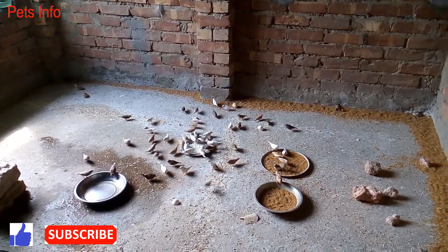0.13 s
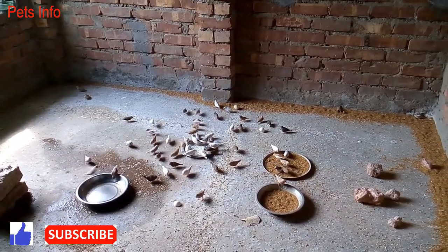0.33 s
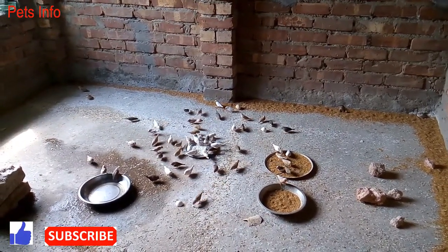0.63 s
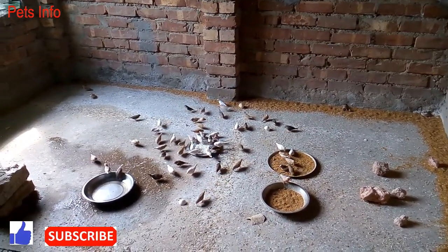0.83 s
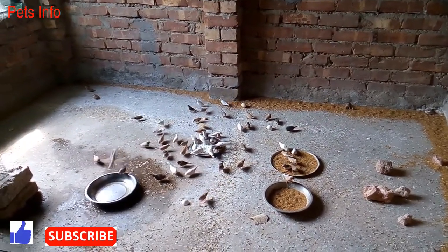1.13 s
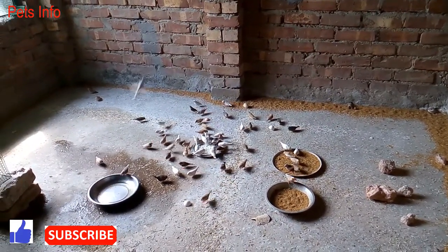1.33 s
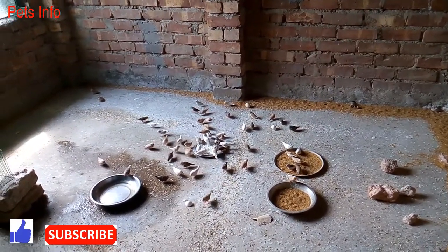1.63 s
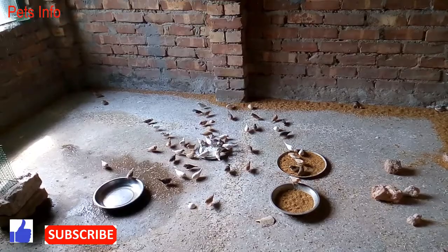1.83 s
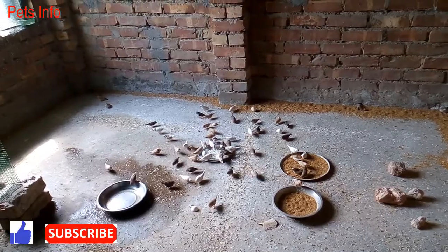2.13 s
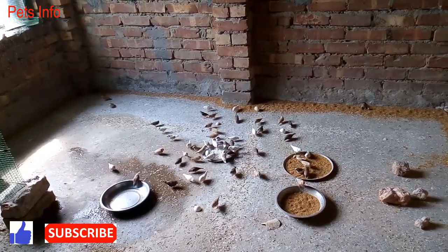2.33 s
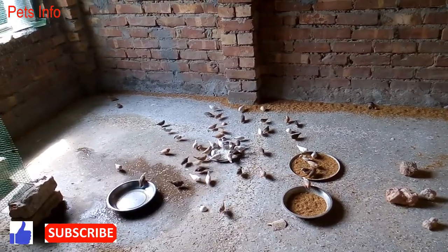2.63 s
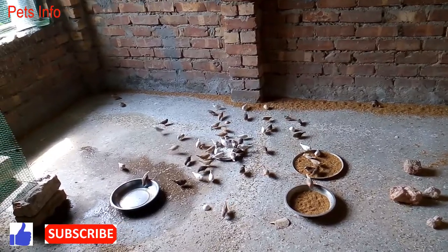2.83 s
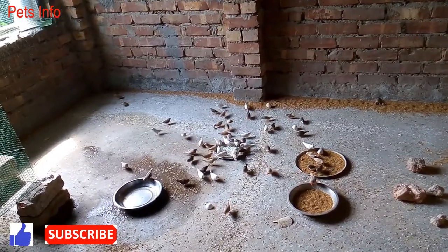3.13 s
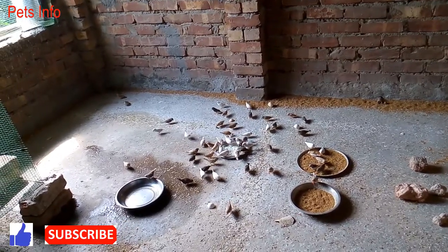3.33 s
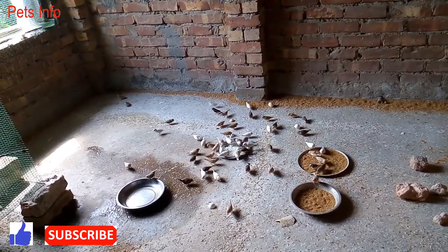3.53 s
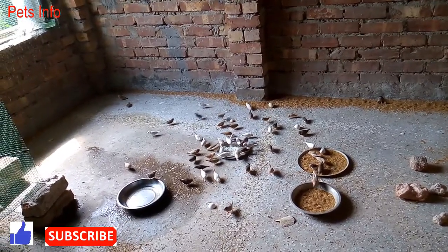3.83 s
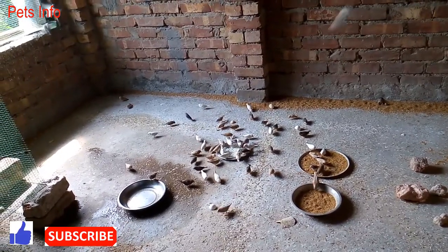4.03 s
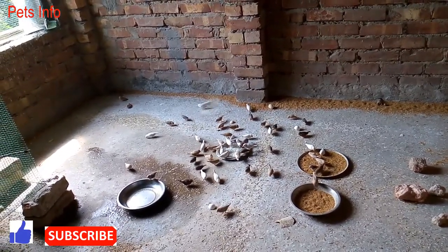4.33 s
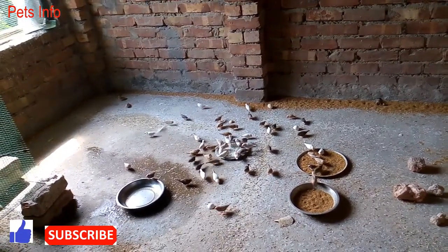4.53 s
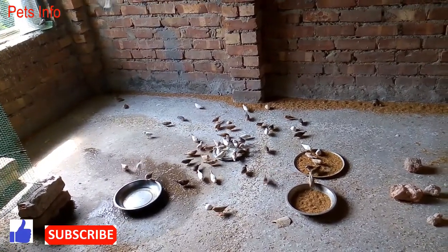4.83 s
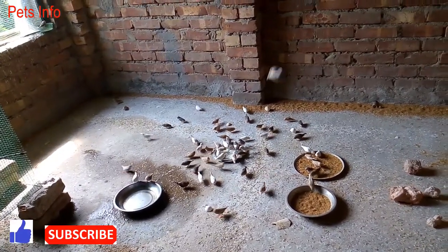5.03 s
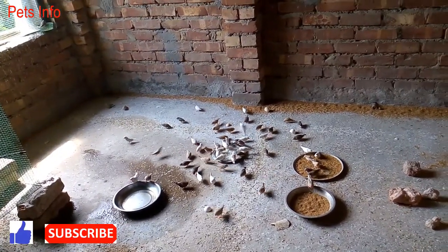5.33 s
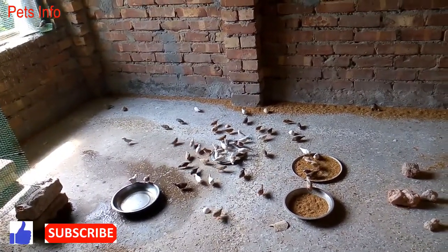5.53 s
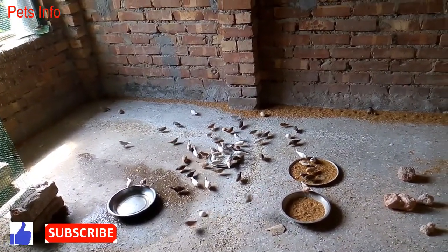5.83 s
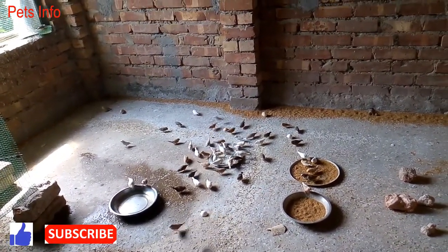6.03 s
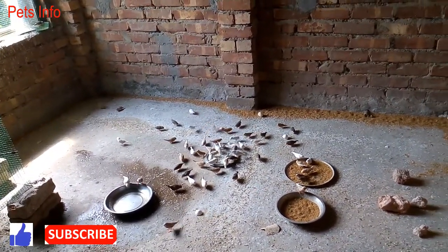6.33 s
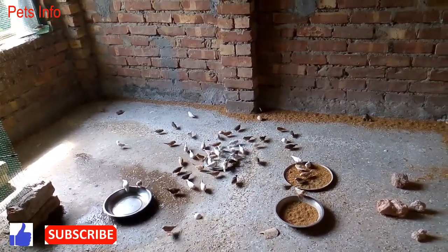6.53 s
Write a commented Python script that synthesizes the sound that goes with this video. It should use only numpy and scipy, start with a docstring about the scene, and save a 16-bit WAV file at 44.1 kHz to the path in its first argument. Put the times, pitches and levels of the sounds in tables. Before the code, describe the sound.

Many small finches call together in a hard-walled brick room. Short nasal beeps, hoarse falling notes and thin sliding whistles overlap above a blurred murmur of distant birds. Wings flutter softly and beaks and feet tap the floor. Past the middle comes a quick bright burst of song with chips; near the end, rapid chips lead into five harsh rasps. The microphone stands back, with a short echo and very faint hum.

```python
"""Finches feeding in a brick aviary

A flock of small finches feeds on a concrete floor: trembling-membrane voices make nasal calls and rasps.
Sliding tones make whistles and a burst of song; then one bird breaks into chips and harsh rasps.
Shaped noise makes fluttering wings, tapping beaks and feet, and a distant murmur.
The walls ring briefly, and a faint hum of steady tones lies underneath."""
import sys
import numpy as np
from scipy import signal
from scipy.fft import rfft, irfft, next_fast_len
from scipy.io import wavfile
from scipy.ndimage import uniform_filter1d

SR = 44100
rng = np.random.default_rng(int(sys.argv[2]) if len(sys.argv) > 2 else 0)


def wav_record(signal):
    """Record a signal, one row per channel, as 16-bit PCM in the file named by sys.argv[1]."""
    frames = np.transpose(np.atleast_2d(signal))
    bounded = np.clip(frames, -1, 1)
    # unit amplitude maps onto the largest positive 16-bit level
    quanta = np.round(bounded * 32767).astype(np.int16)
    wavfile.write(sys.argv[1], SR, quanta)


N = 295029   # length of the scene in samples
LONGEST = SR * 3 // 5   # longest single gesture or echo, in samples
CUTOFF_HZ = 15750   # top of the audible band


def from_db(db):
    """Turn decibels into a gain."""
    return 10 ** (np.asarray(db) / 20)


def rms_one(x):
    """Scale a sound to an rms of 1."""
    return x / np.sqrt(np.mean(x ** 2) + 1e-20)


def at_hz(points, hz):
    """Read a two-column table at a frequency, in between its rows on a log-frequency axis."""
    knots, values = np.transpose(points)
    return np.interp(np.log(np.maximum(hz, 1)), np.log(knots), values)


def by_length(points, length):
    """Read every further column of a table at the length of a call."""
    knots, *columns = np.transpose(points)
    return [np.interp(length, knots, column) for column in columns]


def noise(colour, size):
    """Noise with the given spectrum and an rms of 1."""
    hz = np.linspace(0, SR / 2, size // 2 + 1)
    spectrum = rfft(rng.standard_normal(size)) * from_db(at_hz(colour, hz))
    return rms_one(irfft(spectrum, size))


def tremble(rate_hz, size):
    """Smooth random motion with a spread of about 1: noise through a two-step low-pass."""
    r = np.exp(-2 * np.pi * rate_hz / SR)
    motion = signal.lfilter([1], [1, -2 * r, r * r], rng.standard_normal(LONGEST))
    return rms_one(motion)[-size:]


def progress(length):
    """A ramp from 0 to 1 over one gesture, length in seconds."""
    return np.linspace(0, 1, int(np.clip(length * SR, 64, LONGEST)))


def swell(u, rise, fall):
    """Rounded onset and release, each a share of the gesture."""
    return np.sin(np.pi / 2 * np.clip(np.minimum(u / rise, (1 - u) / fall), 0, 1))


def arch(u, start, middle, end):
    """A smooth curve through three points."""
    return np.polyval(np.polyfit([0, .5, 1], [start, middle, end], 2), u)


def glide_phase(pitch):
    """The phase of a tone whose pitch in Hz changes from sample to sample."""
    return 2 * np.pi * np.cumsum(pitch) / SR


def add(track, s, sound):
    """Mix a sound in at time s, cutting whatever falls outside the scene."""
    at = round(s * SR)
    part = sound[max(-at, 0):max(N - at, 0)]
    track[max(at, 0):max(at, 0) + len(part)] += part


# The tint of the distant murmur. Each row: frequency in Hz, relative level in dB.
MURMUR_COLOUR = [(25, -31), (70, -5), (200, -4.5), (600, -5), (1200, 6), (2500, 22.5), (4200, -3.5),
                 (5700, -4.5), (7000, 10), (12000, -15.5), (16000, -44)]
# The steady hum. Each row: frequency in Hz, rms level in dB.
HUM = [(70, -79), (135, -86), (199, -88), (409, -78.5)]
# A faint low drone that comes and goes.
# Each row: start in seconds, length in seconds, start, middle and end pitch in Hz, level in dB.
DRONE = [(5.18, 0.37, 360, 359, 269, -55.5), (5.211, 0.21, 407, 412, 395, -53)]
MURMUR_DB = -40.5   # level at average excitement


def background(excited_db, drone_jitter=0.023, patchy_db=3.0, count=70):
    """Noise that comes and goes band by band forms a blurred murmur; sine tones form hum and drone."""
    t = np.arange(N) / SR
    hum = sum(np.sqrt(2) * from_db(db) * np.sin(2 * np.pi * hz * t) for hz, db in HUM)
    for s, length, start, middle, end, db in DRONE:
        u = progress(length)
        pitch = arch(u, start, middle, end) * (1 + drone_jitter * tremble(34, size=len(u)))
        add(hum, s, from_db(db) * swell(u, rise=0.042, fall=0.19) * np.sin(glide_phase(pitch)))

    size = next_fast_len(N)
    spectrum = rfft(noise(MURMUR_COLOUR, size=size))
    hz = np.linspace(0, SR / 2, size // 2 + 1)
    murmur = 0
    edges_hz = [0, 250, 900, 1600, 2200, 2900, 3800, 5200, 8000, SR]
    for low, high in zip(edges_hz, edges_hz[1:]):
        patches = np.interp(t, np.linspace(0, N / SR, count), rng.standard_normal(count))
        band = irfft(spectrum * (hz >= low) * (hz < high), size)[:N]
        murmur = murmur + band * from_db(patchy_db * patches)
    return from_db(MURMUR_DB + excited_db) * rms_one(murmur) + hum


# How long the brick room rings. Each row: frequency in Hz, time to fall by 60 dB in seconds.
ROOM_T60 = [(100, 0.81), (1000, 0.33), (3000, 0.38), (7000, 0.22), (15000, 0.16)]


def room(x, first_echo_s=0.0039):
    """Dense wall echoes as fading bands of noise; the lowest bands ring longest."""
    t = np.arange(LONGEST) / SR
    tail = 0
    edges_hz = np.geomspace(40, 18000, 10)
    for low, high in zip(edges_hz, edges_hz[1:]):
        band_pass = signal.butter(2, [low, high], "band", fs=SR, output="sos")
        band = signal.sosfilt(band_pass, rng.standard_normal(LONGEST))
        tail = tail + band * from_db(-60 * t / at_hz(ROOM_T60, np.sqrt(low * high)))
    tail = tail * (t > first_echo_s)
    return signal.fftconvolve(x, tail / np.linalg.norm(tail))[:N]


# The louder taps of beaks and feet. Each row: start in seconds, starting level in dB before tap_db.
TAPS = [(1.036, -38), (1.652, -44.5), (1.71, -36), (2.007, -39), (2.543, -43), (2.859, -36), (2.905, -37),
        (3.052, -33), (3.886, -40), (4.213, -36), (4.29, -32.5), (4.739, -33), (4.878, -30), (4.951, -32),
        (5.076, -42.5)]
# The tint of a tap. Each row: frequency in Hz, relative level in dB.
TAP_COLOUR = [(150, -17.5), (500, -6), (1000, 1), (1900, 7.5), (4000, 2.5), (5600, -11), (7500, 2.5),
              (15000, -29)]


def taps(t60=0.084, tap_db=-2, seed_db=-42, seed_spread_db=4, count=45):
    """Fast-fading noise makes knocks on the floor, among many faint ticks of cracking seed."""
    out = np.zeros(N)
    t = np.arange(4096) / SR
    for s, db in TAPS:
        add(out, s, from_db(db + tap_db - 60 * t / t60) * noise(TAP_COLOUR, size=len(t)))
    starts, sizes = rng.uniform(0, N / SR, count), rng.uniform(-1, 1, count)
    for s, size in zip(starts, sizes):
        # differences between neighbouring samples brighten the tick
        tick = rms_one(np.diff(noise(TAP_COLOUR, size=len(t)), prepend=0))
        add(out, s, from_db(seed_db + seed_spread_db * size - 60 * t / 0.013) * tick)
    return out


# Wing flutters.
# Each row: start in seconds, length in seconds, feather swish in dB, low push of air in dB.
FLUTTERS = [ (-.05, 0.45, -45.5, -60), (.178, .14, -37.5, -99), (0.92, 0.24, -47.5, -62),
            (1.155, 0.56, -47, -58.5), (1.687, 0.27, -49.5, -63.5), (2.263, 0.14, -53, -64.5),
            (2.852, 0.15, -46, -74), (3.036, 0.126, -38, -60.5), (3.447, 0.073, -44, -81),
            (4.189, .13, -46.5, -69), (4.55, 0.57, -50.5, -63), (5.15, 0.54, -53, -64.5),
            (5.636, 0.36, -80, -59)]
# The tint of the feather swish. Each row: frequency in Hz, relative level in dB.
FEATHERS = [(120, -85), (300, 2.5), (700, 2), (1200, 3), (2600, 9), (5600, -2), (7000, 6.5), (11000, -12.5),
            (16000, -63)]
# The tint of the air push. Each row: frequency in Hz, relative level in dB.
AIR_PUSH = [(25, -12), (45, -25), (70, 7), (100, -15.5), (138, 11.5), (175, -13), (260, -6.5), (420, -44.5),
            (900, -23), (3000, -44)]
WINGBEATS_PER_S = 28   # average, the beats are uneven


def wings(stroke_db=7, lumpy_db=2.5, unevenness=0.13):
    """Every wingbeat swells two noises together: the swish of feathers and a puff of air."""
    out = np.zeros(N)
    for s, length, swish_db, push_db in FLUTTERS:
        u = progress(length)
        beats = np.cumsum(WINGBEATS_PER_S * (1 + unevenness * tremble(6.6, size=len(u)))) / SR
        strokes_db = stroke_db * np.cos(2 * np.pi * beats) + lumpy_db * tremble(23.5, size=len(u))
        strokes = rms_one(from_db(strokes_db))
        swish = from_db(swish_db) * noise(FEATHERS, size=LONGEST)
        push = from_db(push_db) * noise(AIR_PUSH, size=LONGEST)
        add(out, s, (swish + push)[:len(u)] * strokes * swell(u, rise=0.21, fall=0.22))
    return out


def syrinx(pitch, jitter, jitter_hz, throat_db, half_db=-80, hoarse_db=-40, uneven_db=0):
    """Harmonics of a trembling membrane, shaped by the throat; alternating cycles add half lines."""
    size = len(pitch)
    phase = glide_phase(pitch * (1 + jitter * tremble(jitter_hz, size=size)))
    k = np.arange(2, 2 * CUTOFF_HZ / pitch.mean())[:, None] / 2   # 1, 1.5, 2, .. times the pitch
    own_db = uneven_db * rng.standard_normal(size=(128, 1))[:len(k)]   # every call favours other partials
    hz = k * pitch[::64]   # the throat is read once every 64 samples
    gains = from_db(throat_db(hz) + own_db + half_db * (k % 1 > 0)) * (hz < SR / 2)
    partials = np.sin(np.float32(k * phase + k ** 2))
    tone = rms_one(np.sum(gains[:, np.arange(size) // 64] * partials, axis=0))
    # turbulence escapes once a cycle and passes through the same throat
    air = rng.standard_normal(LONGEST)[:size] * (1 + np.cos(phase))
    throat = from_db(throat_db(np.linspace(20, SR / 2, size // 2 + 1)))
    air = rms_one(irfft(rfft(air) * throat, size))
    return rms_one(tone + from_db(hoarse_db) * air)


FAR_DB = -41   # typical level of one distant call at average excitement
# The throat in nasal calls, far and near. Each row: frequency in Hz, relative level in dB.
NASAL_THROAT = [(500, -45), (950, -17.5), (1400, -8), (1900, -5), (2600, 1), (3800, -1), (4900, -0.5),
                (5700, -7.5), (6800, -7), (8500, -24), (11500, -24), (13500, -34), (16000, -56)]


def far_calls(spread_db=3.0, far_hz=830, pitch_spread=.3, far_s=.075, length_spread=0.38, count=70):
    """Soft, short membrane calls, spread at random over the whole scene."""
    def throat(hz):
        return at_hz(NASAL_THROAT, hz) - 12 * (hz < 1400)   # the fundamental hardly carries

    out = np.zeros(N)
    for k, (when, length, pitch, size) in enumerate(rng.uniform(-1, 1, (count, 4))):
        u = progress(far_s * (1 + length_spread * length))
        top = far_hz * (1 + pitch_spread * pitch)
        voice = syrinx(arch(u, .96 * top, top, .92 * top), .012, 260, throat, hoarse_db=-14, uneven_db=4.5)
        add(out, (k + when) / count * N / SR, voice * np.sin(np.pi * u) * from_db(FAR_DB + spread_db * size))
    return out


WAVER_SHARE, WAVER_HZ = 0.00618, 26   # slow unsteadiness of the pitch: share of the pitch, and rate


def nasal_call(length, pitch, shape, rough, beak, jitter=.039, jitter_hz=260,
               beak_db=7, beak_rough_db=2, beak_octaves=0.39, half_db=-19, half_rough_db=12,
               rise=0.28, fall=0.55, shake_db=2.0, hoarse_db=-26, hoarse_rough_db=27):
    """A curved harmonic stack; the beak opening lifts one region, and rough calls turn hoarse."""
    def throat(hz):
        lift_db = beak_db + beak_rough_db * rough
        return at_hz(NASAL_THROAT, hz) + lift_db * np.exp(-(np.log2(hz / beak) / beak_octaves) ** 2)

    u = progress(length)
    waver = 1 + WAVER_SHARE * tremble(WAVER_HZ, size=len(u))
    glide = pitch * arch(u, shape[0], 0.99, shape[1]) * waver
    voice = syrinx(glide, jitter * rough, jitter_hz, throat, half_db + half_rough_db * rough,
                   hoarse_db + hoarse_rough_db * np.sqrt(abs(rough)), uneven_db=3.0)
    return voice * swell(u, rise, fall) * from_db(shake_db * tremble(67, size=len(u)))


# Short contact calls with an arched pitch.
# Each row: start in seconds, base pitch in Hz, level in dB, beak resonance in Hz.
CONTACT_CALLS = [ (.115, 980, -31.5, 2530), (.941, 873, -36, 2470), (1.389, 942, -33, 2600),
                 (1.848, 899, -32.5, 3840), (1.96, 905, -34, 3750), (2.116, 888, -33.5, 3930),
                 (2.261, 894, -29, 5040), (2.478, 838, -39, 2720), (3.256, 912, -33.5, 3530),
                 (3.396, 893, -34.5, 3240), (3.595, 903, -29, 4900), (5.62, 892, -34.5, 2660),
                 (5.868, 916, -30.5, 2770)]
CONTACT_S, CONTACT_ROUGH = .093, 0.49   # length in seconds; roughness 0-1
# Long clear calls.
# Each row: start in seconds, length in seconds, base pitch in Hz, level in dB, beak resonance in Hz.
LONG_CALLS = [(0.569, 0.16, 974, -26.5, 4470), (3.675, 0.11, 942, -33, 3970),
              (3.783, .17, 965, -29.5, 3620), (5.141, .205, 960.5, -31, 3700), (6.06, .13, 955, -28, 3700)]
LONG_ROUGH = .11   # roughness 0-1
# Pitch of contact and long calls at the start and at the end, as shares of the base pitch.
CALL_ARCH = (0.97, 0.96)
# Low, nearly level calls. Each row: start in seconds, length in seconds, base pitch in Hz, level in dB.
LOW_CALLS = [ (.395, 0.22, 610.7, -30.5), (1.167, 0.1, 566, -34.5), (1.387, 0.26, 638, -40),
             (1.773, 0.091, 580, -38.5), (2.182, 0.092, 652, -39), (2.415, 0.23, 635, -45.5),
             (2.58, .09, 545, -40.5), (2.737, 0.063, 574, -42.5), (3.33, 0.2, 497, -36),
             (5.005, 0.16, 609, -46), (5.658, 0.17, 600, -30)]
# Pitch of low calls at the start and at the end, as shares of the base pitch.
LOW_SAG = (1.02, 0.98)
# The longer a low call is held, the wider the beak and the clearer the voice.
# Each row: length in seconds, roughness 0-1, beak resonance in Hz.
LOW_VOICE = [(.09, 0.46, 2920), (.17, 0.17, 4100)]
# Hoarse falling calls.
# Each row: start in seconds, length in seconds, base pitch in Hz, level in dB, beak resonance in Hz.
HOARSE_CALLS = [ (-.04, 0.15, 891.6, -27, 3800), (0.199, 0.077, 824, -34, 2900),
                (0.661, 0.2, 789, -33, 2400), (1.23, 0.26, 1127, -32, 4630), (2.323, 0.077, 815, -32, 4550),
                (3.088, .13, 819, -35.5, 3920), (3.505, .14, 1121, -31, 5000),
                (3.917, .075, 1108, -34, 4050), (4.493, 0.2, 1156, -33, 2440),
                (4.874, 0.11, 827, -35.5, 2860), (5.326, 0.064, 844, -35, 3360),
                (5.488, .19, 939, -33.5, 4170)]
HOARSE_FALL, HOARSE_ROUGH = (1.05, .9), 0.892   # start and end, shares of base pitch; roughness 0-1


def nasal_calls():
    """Four kinds of membrane call; contact and long calls share one arch, low ones clear with length."""
    out = np.zeros(N)
    for s, pitch, db, beak in CONTACT_CALLS:
        add(out, s, from_db(db) * nasal_call(CONTACT_S, pitch, CALL_ARCH, CONTACT_ROUGH, beak))
    for s, length, pitch, db, beak in LONG_CALLS:
        add(out, s, from_db(db) * nasal_call(length, pitch, CALL_ARCH, LONG_ROUGH, beak))
    for s, length, pitch, db in LOW_CALLS:
        rough, beak = by_length(LOW_VOICE, length)
        add(out, s, from_db(db) * nasal_call(length, pitch, LOW_SAG, rough, beak))
    for s, length, pitch, db, beak in HOARSE_CALLS:
        add(out, s, from_db(db) * nasal_call(length, pitch, HOARSE_FALL, HOARSE_ROUGH, beak))
    return out


# How strong an overtone of a whistle is. Each row: overtone frequency in Hz, dB against the fundamental.
OVERTONES = [(3500, 4), (4800, -25), (5700, -18), (7200, -19), (8800, -19.5), (10000, -37), (15000, -44)]


def whistle(length, pitches, rough, jitter=0.0896, jitter_hz=550, rise=0.17, fall=0.12,
            shake_db=4, buzz_db=8):
    """A gliding tone with overtones, faint when high, blurred by fast trembles of pitch and strength."""
    u = progress(length)
    glide = arch(u, *pitches)
    phase = glide_phase(glide * (1 + jitter * rough * tremble(jitter_hz, size=len(u))))
    tone = np.sin(phase)
    for k in range(2, 5):
        tone = tone + from_db(at_hz(OVERTONES, k * glide)) * np.sin(k * phase)
    buzz = buzz_db * rough * np.tanh(tremble(250, size=len(u)))
    shake = shake_db * np.tanh(tremble(137, size=len(u)))
    return rms_one(tone * from_db(buzz + shake)) * swell(u, rise, fall)


# Sliding whistles, mostly falling.
# Each row: start in seconds, length in seconds, mid-whistle pitch in Hz, slide in semitones, level in dB.
WHISTLES = [ (0.056, 0.013, 2280, 3, -26.5), (.447, .12, 4610, -2.5, -33), (0.715, 0.073, 4320, -3.5, -36),
            (.759, 0.036, 3630, -2, -26.5), (0.8, .062, 2632, -3, -20.5), (1.075, 0.044, 4360, 0, -34),
            (1.258, 0.065, 4540, -1.5, -33.5), (1.44, .041, 2800, -1.5, -36), (1.88, .05, 3470, -3, -31.5),
            (1.912, 0.096, 4590, -1.5, -33), (1.981, 0.087, 3680, -1.5, -32.5),
            (2.223, 0.019, 2400, 2, -29.5), (2.27, 0.13, 4430, -1.5, -33.5), (2.325, 0.033, 2500, 3, -32.5),
            (3.129, 0.045, 3570, 0.5, -35), (3.16, 0.084, 4530, -1, -30.5), (3.219, .11, 3650, -1.5, -35.5),
            (3.527, 0.097, 4600, -3, -36), (4.964, .095, 2382, -4.5, -31.5), (5.062, 0.088, 2460, 2, -43),
            (5.134, 0.16, 1810, 6, -35), (5.226, .1, 2429, 4, -23.5), (5.3, 0.065, 2155, -1.5, -33.5),
            (5.38, 0.053, 2390, -10.5, -31.5), (5.489, 0.037, 4790, -1, -28),
            (5.529, 0.089, 4430, -3.5, -36), (5.693, 0.15, 4270, -4.5, -33), (6.275, 0.083, 3314, -4, -26),
            (6.352, 0.065, 2754, 0, -19), (6.635, .041, 2480, 1.5, -30), (6.66, .02, 3380, 4.5, -25)]
# Whistles of middling pitch are the smoothest. Each row: pitch in Hz, roughness before strain.
WHISTLE_ROUGH = [(1900, 0.68), (2700, 0.17), (4500, 0.64)]
# Roughness grows the longer a whistle is held. Each row: length in seconds, factor on the roughness.
WHISTLE_STRAIN = [(.04, 0.78), (.1, 1.13)]
EARLY_SLIDE = .6   # share of the slide covered in the first half of a whistle


def whistles():
    """Gliding tones that slide faster in their first half than in their second."""
    out = np.zeros(N)
    for s, length, pitch, slide, db in WHISTLES:
        semitones = slide * np.array([-EARLY_SLIDE, 0, 1 - EARLY_SLIDE])
        strain, = by_length(WHISTLE_STRAIN, length)
        rough = at_hz(WHISTLE_ROUGH, pitch) * strain
        add(out, s, from_db(db) * whistle(length, pitch * 2 ** (semitones / 12), rough))
    return out


# The warble of the song.
# Each row: start in seconds, length in seconds, start pitch in Hz, end pitch in Hz, level in dB.
WARBLE = [(4.284, .036, 3700, 4630, -21.5), (4.313, 0.032, 3100, 3147, -19.5),
          (4.354, .066, 3660, 2400, -19.5), (4.398, 0.047, 2500, 2830, -24.5),
          (4.482, 0.029, 3800, 2800, -22), (4.529, 0.057, 2800, 4204, -18.5), (4.577, .03, 3850, 3005, -29),
          (4.69, .041, 3870, 3800, -26)]
WARBLE_SAG, WARBLE_ROUGH = .96, 0.57   # mid-note pitch as a share of the even glide; roughness 0-1
# One quick upsweep, repeated through the song. Each row: start in seconds, level in dB.
UPSWEEPS = [(4.506, -19.5), (4.638, -19), (4.763, -18.5), (4.83, -19), (4.9, -40)]
UPSWEEP_HZ = (3220, 4080, 4280)   # start, middle and end pitch
UPSWEEP_S, UPSWEEP_ROUGH = .017, 0.58   # length in seconds; roughness 0-1


def song():
    """Gliding tones form a rough warble, laced with upsweeps that share one pitch curve."""
    out = np.zeros(N)
    for s, length, start, end, db in WARBLE:
        middle = WARBLE_SAG * np.sqrt(start * end)
        add(out, s, from_db(db) * whistle(length, (start, middle, end), WARBLE_ROUGH))
    for s, db in UPSWEEPS:
        add(out, s, from_db(db) * whistle(UPSWEEP_S, UPSWEEP_HZ, UPSWEEP_ROUGH))
    return out


# Chips, quick up-and-down flicks.
# Each row: start in seconds, length in seconds, top pitch in Hz, level in dB.
CHIPS = [ (4.149, 0.029, 1580, -25.5), (4.233, 0.025, 1510, -23), (4.417, 0.054, 1550, -24.5),
         (4.625, 0.036, 1355, -30.5), (4.669, 0.06, 1426, -19.5), (4.753, 0.02, 1420, -23.5),
         (4.82, 0.02, 1372, -25), (4.961, 0.013, 1290, -38), (5.687, 0.014, 2260, -32),
         (5.746, .025, 2580, -23), (5.816, 0.016, 2520, -20), (5.869, 0.018, 2655, -19),
         (5.931, .013, 2478, -20.5), (5.985, 0.017, 2686, -19.5)]
# The throat in chips and rasps. Each row: frequency in Hz, relative level in dB.
HARSH_THROAT = [(700, -38.5), (1450, -30.5), (2450, 2.5), (3100, 2), (3900, 3.5), (4900, 4), (5700, -1.5),
                (6800, 9), (8100, -3.5), (9100, 0.5), (9800, -16), (10400, -6.5), (12000, -24.5),
                (15500, -24.5)]
# Longer chips are pushed harder and are brighter.
# Each row: length in seconds, added tilt above the top pitch in dB per octave.
CHIP_BRIGHTNESS = [(.025, -6.5), (.05, 1)]
# Low chips are harsher. Each row: top pitch in Hz, roughness 0-1.
CHIP_ROUGH = [(1500, .85), (2500, 0.28)]


def harsh_throat(hz):
    """The throat's gain in dB when the voice is driven hard."""
    return at_hz(HARSH_THROAT, hz)


def chips(low_share=0.5, jitter=0.045, rise=0.67, fall=0.49):
    """The membrane's pitch shoots up and drops back within a few hundredths of a second."""
    out = np.zeros(N)
    for s, length, top, db in CHIPS:
        u = progress(length)
        bright, = by_length(CHIP_BRIGHTNESS, length)

        def throat(hz):
            return harsh_throat(hz) + bright * np.log2(np.maximum(hz / top, 1))

        pitch = arch(u, low_share * top, top, low_share * top)
        voice = syrinx(pitch, jitter * at_hz(CHIP_ROUGH, top), 570, throat,
                       half_db=-20, hoarse_db=-3.5, uneven_db=9.5)
        add(out, s, voice * swell(u, rise, fall) ** 2 * from_db(db))
    return out


# Harsh rasps, about six a second. Each row: start in seconds, length in seconds.
RASPS = [(6.009, .08), (6.157, 0.12), (6.323, .1), (6.498, .095), (6.647, 0.11)]
RASP_HZ, RASP_DB = 541.7, -20.5   # average pitch; level in mid-rasp before the grain


def rasps(jitter=0.0348, jitter_hz=450, push_db=6, grain_db=1.5):
    """A hard-driven, irregular membrane buzz that starts abruptly and swells in the middle."""
    out = np.zeros(N)
    for s, length in RASPS:
        u = progress(length)
        voice = syrinx(np.full(len(u), float(RASP_HZ)), jitter, jitter_hz, harsh_throat,
                       half_db=-4.5, hoarse_db=-6, uneven_db=4.0)
        effort_db = push_db * (np.sin(np.pi * u) - 1) + grain_db * tremble(200, size=len(u))
        add(out, s, voice * swell(u, rise=0.094, fall=0.28) * from_db(RASP_DB + effort_db))
    return out


FLOCK_FOLLOWS, EXCITEMENT_S = .55, 0.24   # share of the near birds' swing in dB; averaging time in seconds


def excitement(calls, calm_db=-42, full_db=-27):
    """The far birds join in when the near ones call: dB above or below their usual level."""
    power = uniform_filter1d(calls ** 2, max(int(EXCITEMENT_S * SR), 1))
    db = np.clip(10 * np.log10(np.abs(power) + 1e-12), calm_db, full_db)
    return FLOCK_FOLLOWS * (db - db.mean())


def scene():
    """Mix the direct sound of every bird with its room echo, over the background."""
    calls = nasal_calls()
    near = whistles() + song() + rasps()
    sharp = chips() + taps()
    excited_db = excitement(calls + from_db(-7) * near)
    flock = calls + from_db(excited_db) * far_calls() + wings()
    direct = from_db(2.0) * flock + from_db(2) * near + from_db(5) * sharp
    echo = room(from_db(-3.5) * flock + from_db(-3.5) * near + from_db(1.0) * sharp)
    return (direct + echo + background(excited_db))[None]


# The dip in the microphone's response, one row: centre in Hz, width in Hz, share removed 0-1.
MIC_DIP = (5750, 800, .55)


def record(dry, top=0.78):
    """The microphone has a dip in the treble; the highest peaks are rounded and the top is cut steeply."""
    hz, width_hz, share = MIC_DIP
    dip_band = signal.lfilter(*signal.iirpeak(hz, hz / width_hz, fs=SR), dry)
    coloured = dry - share * dip_band
    rounded = coloured / (1 + (coloured / top) ** 4) ** (1 / 4)
    steep_cut = signal.ellip(10, .2, 80, CUTOFF_HZ, fs=SR, output="sos")
    return signal.sosfilt(steep_cut, rounded)


dry = scene()
out = record(dry)
wav_record(out)
```